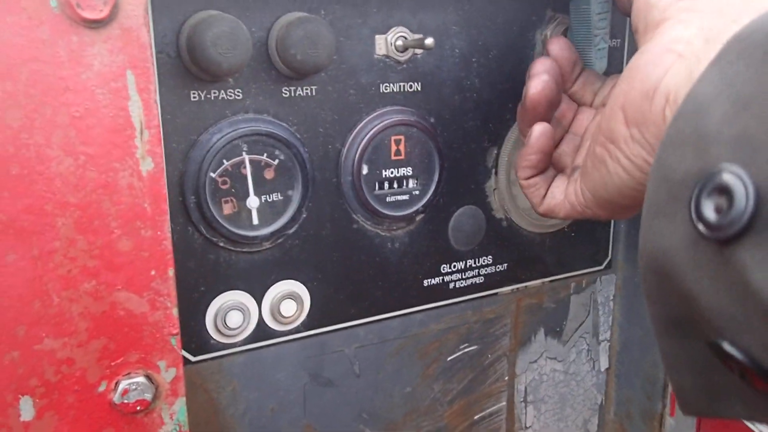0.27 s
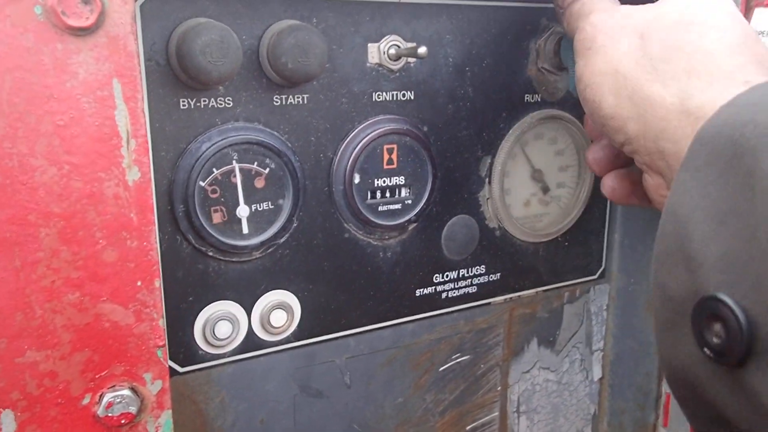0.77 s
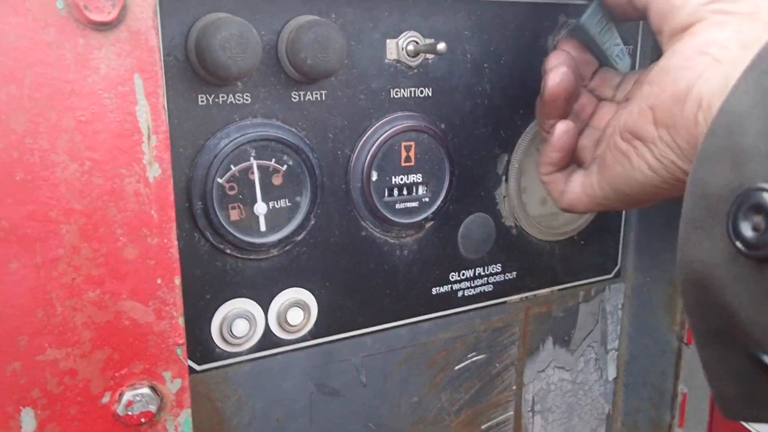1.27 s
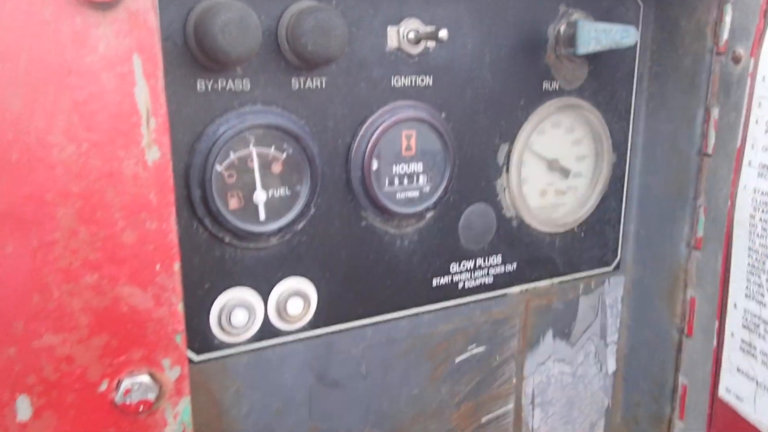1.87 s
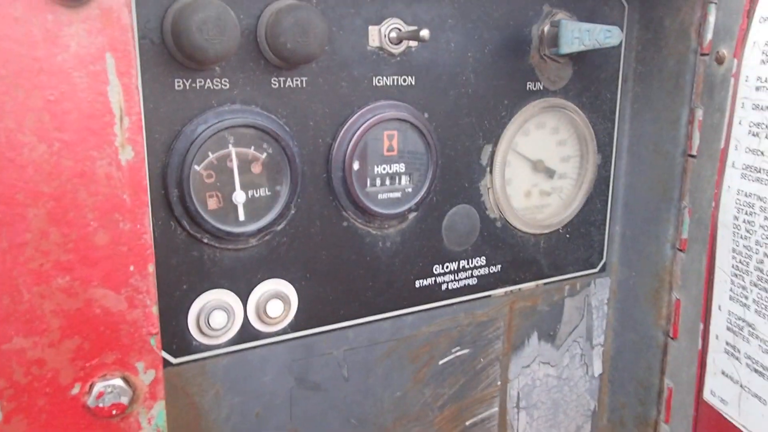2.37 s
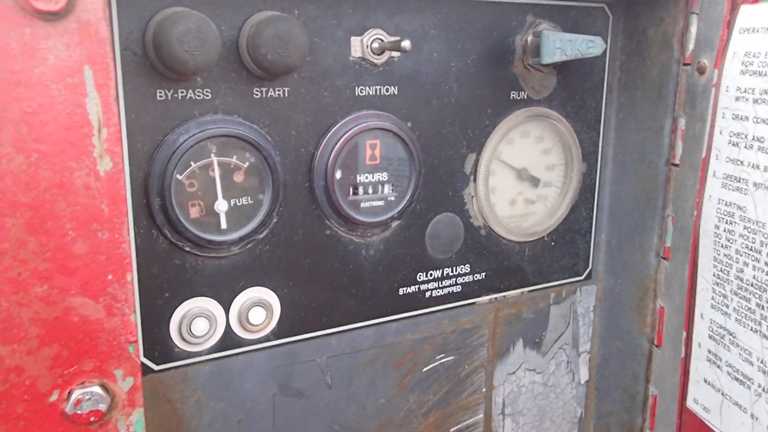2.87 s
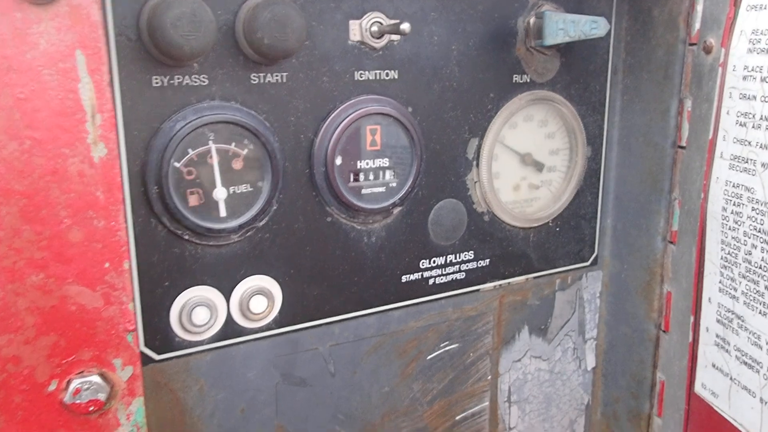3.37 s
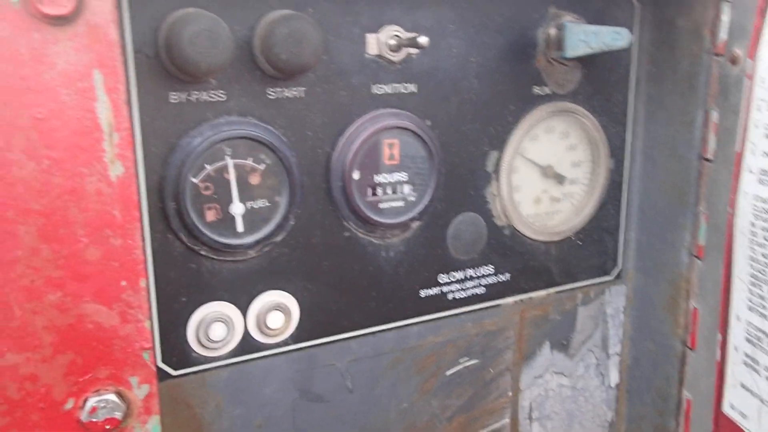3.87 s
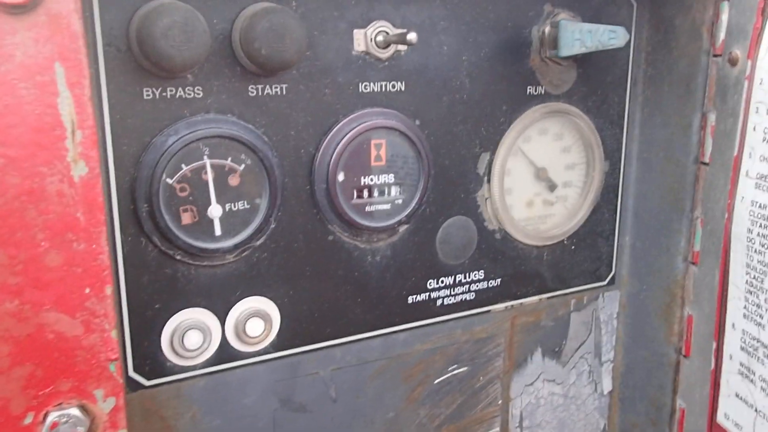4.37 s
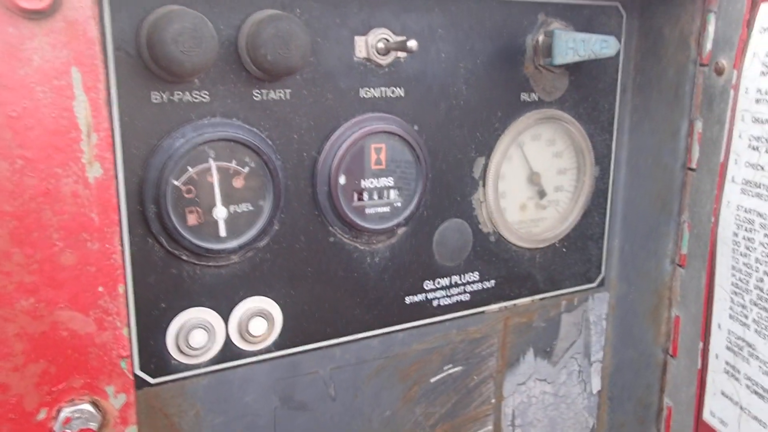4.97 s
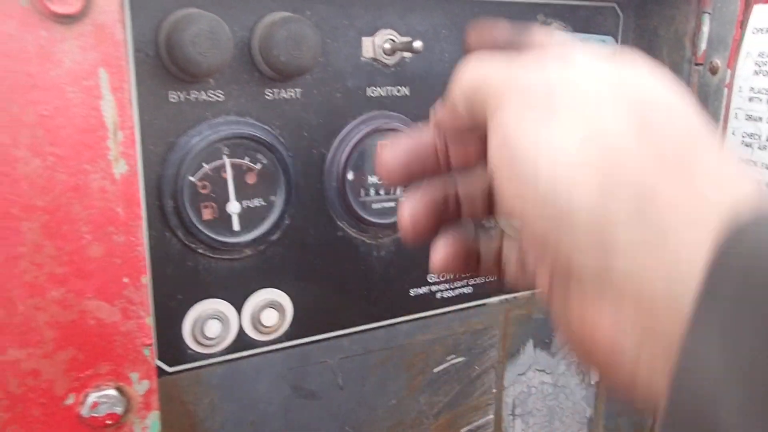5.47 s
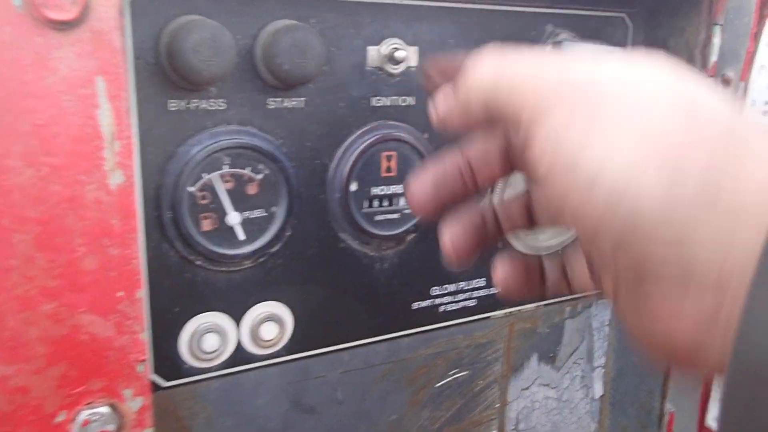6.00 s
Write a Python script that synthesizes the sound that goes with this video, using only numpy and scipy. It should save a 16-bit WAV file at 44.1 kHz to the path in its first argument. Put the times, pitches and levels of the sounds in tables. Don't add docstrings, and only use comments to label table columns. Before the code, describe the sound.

Very close to the microphone, compressed air roars from an open valve, wide and bright, then narrows into a whistling jet with a metallic, hollow echo from the housing. It shuts abruptly. The recording level climbs and reveals a clattering diesel idle, rotor whine and a faint leak hiss. Near the end a switch clicks and the engine begins running down. The left side is muffled and much duller.

```python
import sys
import numpy as np
from scipy import signal
from scipy.fft import rfft, irfft, next_fast_len
from scipy.io import wavfile
from scipy.ndimage import uniform_filter1d

SR = 44100
rng = np.random.default_rng(int(sys.argv[2]) if len(sys.argv) > 2 else 0)


def dump_mix(stems):
    frames = np.atleast_2d(stems).T
    limited = np.clip(frames, -1, 1)
    pcm = np.round(limited * 32767).astype(np.int16)
    wavfile.write(sys.argv[1], SR, pcm)


def elevation(decibels):
    levels = np.asarray(decibels, float)
    return 10 ** (levels / 20)


N = 275166
T = np.arange(N) / SR
SLOW = T[::16]
SIZE = next_fast_len(N + SR // 4)
HZ = np.maximum(np.arange(SIZE // 2 + 1) * SR / SIZE, 1)

SHUTS_S, SEALED_S = 4.02, 4.046
LOADS_S, FUEL_CUT_S, UNFIRED_S = 1.69, 5.96, 0.097
IDLE_HZ = 13.053

# start_s, narrow_share (of the jet, 0-1)
VALVE_TURN = [
    (0, 0.1),
    (1.2, 0.21),
    (1.6, 0.26),
    (1.9, 0.79),
    (2.4, 0.91),
    (4.04, 0.98),
]
# freq_hz, level_db
OPEN_PORT = [(2400, 0), (3000, 2.5), (3750, -1.5), (4020, -7.5), (4350, 5.5), (5200, 6.5), (6600, 3.5),
             (7900, 6), (8600, 3.5), (9250, -4), (9800, -0.5), (14000, 0), (15200, -0.5), (15700, -15)]


def since(s):
    return np.maximum(T - s, 0)


def curve(table):
    s, *columns = np.transpose(table)
    return [np.interp(T, s, c) for c in columns]


def fine(v):
    return np.interp(T, SLOW, v)


def shape(table, axis=1):
    table = np.array(table)
    return np.interp(np.log(HZ), np.log(table[:, 0]), table[:, axis])


def through(x, response):
    return irfft(rfft(x, SIZE) * response, SIZE)[:N]


def heard(x, lo_hz, hi_hz):
    band = through(x, elevation(shape(OPEN_PORT)) * (HZ > lo_hz) * (HZ < hi_hz))
    return x / np.sqrt(np.mean(band ** 2))


def walk(rate):
    k = int(SR / 16 / rate)
    held = np.repeat(rng.standard_normal(len(SLOW) // k + 1), k)[:len(SLOW)]
    return 1.3 * uniform_filter1d(uniform_filter1d(held, k), k)


def whistle(hz, width_hz, db):
    pole = np.exp(-np.pi * width_hz * 16 / SR)
    swell = elevation(db + 1.96 * walk(2.886) + 1.45 * walk(20))
    a, b = signal.lfilter([1 - pole], [1, -pole], rng.standard_normal((2, len(SLOW)))) * swell
    centre_hz = hz * (1 + .006 * walk(2.5) - .0025 * (SLOW - 2.5))
    phase = 2 * np.pi * np.cumsum(fine(centre_hz)) / SR
    return (fine(a) * np.cos(phase) + fine(b) * np.sin(phase)) / np.sqrt(8)


def turbulence(spectrum, common_db, own_db, pipes=(), upper_pipes_db=0):
    colour = elevation(shape(spectrum))
    noise = rfft(rng.standard_normal(SIZE)) * colour
    common = common_db * (walk(5) + walk(40))
    halves = 2 * np.log2(HZ)
    first, last = int(2 * np.log2(spectrum[0][0])), int(2 * np.log2(spectrum[-1][0]))
    out = 0
    for step in range(first, last + 2):
        bell = .5 + .5 * np.cos(np.pi * np.clip(halves - step, -1, 1))
        out = out + fine(elevation(common + own_db * walk(11))) * irfft(noise * bell, SIZE)[:N]
    for hz, width_hz, db in pipes:
        level_db = db + upper_pipes_db[::16] * (hz > 7000)
        out = out + np.interp(hz, HZ, colour) * whistle(hz, width_hz, level_db)
    return out


def tones(cycles, orders, wander_db):
    out = 0
    for k, db in orders:
        swell = fine(elevation(db + wander_db * (walk(2.89) + walk(25))))
        out = out + swell * np.sin(2 * np.pi * (k * cycles + rng.random()))
    return out


def engine_speed():
    free_hz, settle_s, run_down_hz_per_s = 16, 0.33, 13
    eased = .5 - .5 * np.cos(np.pi * np.clip(since(LOADS_S) / settle_s, 0, 1))
    return free_hz + (IDLE_HZ - free_hz) * eased - run_down_hz_per_s * since(FUEL_CUT_S)


def rotor_load():
    # start_s, level_db
    load = [
        (1.7, -17),
        (2.6, -4),
        (4.05, -3.5),
        (4.3, -7),
        (4.6, 0.5),
        (4.9, -5.5),
        (5.5, -9.5),
        (6.24, -13),
    ]
    return curve(load)[0]


def small_leak(cycles, whine_db):
    # freq_hz, level_db
    hiss = [(500, -12), (2000, -6.5), (5000, 0), (10000, -1.5), (16000, -5)]
    # freq_hz, width_hz, over_hiss_db
    pipes = [(5260, 140, -2), (10400, 130, 2), (11700, 210, -9)]
    level_db, late_db, build_s, blowdown_db_per_s = -41.3, -4.5, 0.15, 7
    leak = heard(turbulence(hiss, 0.29, 0.75, pipes, 0.76 * whine_db + 4.3), 4160, 9200)
    pulse_db = 0.25 * np.cos(2 * np.pi * cycles)
    build_db = late_db * np.exp(-since(SEALED_S) / build_s)
    return leak * elevation(pulse_db) * elevation(level_db + build_db + blowdown_db_per_s * since(FUEL_CUT_S))


def screw_rotors(cycles, whine_db):
    # cycle_multiple, level_db
    mesh = [(48, -9), (60, 2.5), (96, -4), (108, -11), (120, -7), (132, -17), (144, -10.5)]
    return tones(cycles, mesh, 1.7) * elevation(-42 + whine_db)


def engine_exhaust(cycles, emerge_db, unfired_db, sealed):
    # cycle_multiple, level_db
    orders = [(3, -38), (4, -6), (5, -27), (6, -65), (7, -11), (8, 3), (9, -28.5), (10, -20)]
    beat = tones(cycles, orders[:2], .4) * elevation(0.4 * unfired_db)
    bark = tones(cycles, orders[2:], .4) * elevation(unfired_db)
    return heard(beat + bark, 45, 127) * elevation(-41.5 + emerge_db + 1.5 * sealed)


def engine_body(cycles, speed, whine_db, emerge_db, unfired_db, sealed):
    # cycle_multiple, level_db
    hum = [(13.35, -2.5), (14, -25), (20, -6.5), (24, 4), (27, -0.5), (29, -8), (30, -12), (34, -28),
           (35, -11), (36, -5), (38, -6), (40, -6.5), (52, -19), (61, -4), (68, -7.5), (82, -1.5),
           (102, -17)]
    # freq_hz, level_db
    clatter = [(30, -28), (70, -7.5), (160, 1), (300, -3), (700, -2), (1100, -4), (1600, -8), (2300, -14.5),
               (5000, -19.5)]
    block = tones(cycles, hum, 1.6) * elevation(-13.0 + .5 * emerge_db + 4.2 * sealed + 0.15 * unfired_db)
    pattern = rng.standard_normal(3380)
    rattle = np.interp(cycles % 1 * len(pattern), np.arange(len(pattern)), pattern)
    rattle = heard(through(rattle, elevation(shape(clatter))), 400, 1800) * elevation(-8.0)
    loose = heard(turbulence(clatter, 0.33, 0.83), 290, 2600) * elevation(-2.5)
    slowing = np.minimum(speed / IDLE_HZ, 1) ** 0.3
    return (block + rattle + loose) * elevation(-41.5 + 1.2 + 0.12 * whine_db) * slowing


def machine():
    speed = engine_speed()
    cycles = np.cumsum(speed) / SR
    whine_db = rotor_load()
    emerge_db = -24 * np.exp(-since(LOADS_S) / 0.19)
    unfired_db = -13 * np.clip(since(FUEL_CUT_S) / UNFIRED_S, 0, 1)
    sealed = np.clip(since(SHUTS_S) / 0.3, 0, 1)
    air = small_leak(cycles, whine_db) + screw_rotors(cycles, whine_db)
    exhaust = engine_exhaust(cycles, emerge_db, unfired_db, sealed)
    return air + exhaust + engine_body(cycles, speed, whine_db, emerge_db, unfired_db, sealed)


def switch():
    # start_s, peak_db
    snaps = [
        (5.922, -24.5),
    ]
    out = np.zeros(N)
    for s, db in snaps:
        t = since(s)
        envelope = (T > s) * (1 - np.exp(-t / .001)) * np.exp(-t / 0.0043)
        out += elevation(db) * envelope * rng.standard_normal(N)
    return through(out, 1 / (1 + (3500 / HZ) ** 4) / (1 + (HZ / 9000) ** 4))


def wide_blast():
    # freq_hz, level_db
    hiss = [(40, -38), (70, -14), (110, -11), (300, -8), (1000, -7), (2500, -6), (4500, -2), (7000, -1.5),
            (10000, -6), (14000, -1), (16000, 0)]
    # freq_hz, width_hz, over_hiss_db
    pipes = [(4510, 143, 3), (4960, 160, 1.5), (5396, 240, 6.5), (5660, 110, 0), (7770, 380, 1.5)]
    return heard(turbulence(hiss, 0.64, 0.83, pipes, np.full(N, -0.8)), 4760, 7950)


def narrow_jet():
    # freq_hz, level_db
    hiss = [(100, -52.5), (400, -17.5), (1000, -10), (2500, -3), (5000, 1), (7700, 0.5), (10000, -6),
            (14000, -4), (16000, -3)]
    # freq_hz, width_hz, over_hiss_db
    pipes = [(929, 77, 1.8), (2613, 59, 4.2), (3244, 150, 3.1), (3748, 100, 0.5), (4497, 77, 8.1),
             (4930, 85, 4.7), (5100, 59, 8), (5290, 71, 6.6), (5720, 100, 7.5), (6030, 110, 2),
             (6790, 140, 1), (7350, 66, 9.5), (7730, 77, 5), (7880, 75, 8), (8210, 145, 3), (8500, 88, 5.6)]
    # delay_ms, gain_below_4khz, gain_above_4khz
    panels = [(1.36, 0.052, 0.065), (1.56, 0.11, -0.091), (1.72, 0.058, 0.054), (2.2, -0.18, 0.0067),
              (2.4, 0.3, -0.052), (2.75, -0.47, 0.043), (3.1, 0.03, -0.032), (4.3, 0.23, 0.18)]
    upper_db = -6.5 + 5.5 * since(2.08) - 500 * since(4.02)
    high = 1 / (1 + (4000 / HZ) ** 8)
    comb = 1
    for ms, lo, hi in panels:
        comb = comb + (lo + (hi - lo) * high) * np.exp(-2j * np.pi * HZ * ms / 1000)
    return heard(through(turbulence(hiss, 0.6, 0.48, pipes, upper_db), comb), 3980, 7230)


def vent():
    vent_db, sag_db_per_s, shut_db_per_s, sealed_db_per_s = -11.2, 0.45, 150, 900
    narrow = np.clip(curve(VALVE_TURN)[0], 0, 1)
    closing_db = shut_db_per_s * since(SHUTS_S) + sealed_db_per_s * since(SEALED_S)
    level_db = vent_db - sag_db_per_s * T - closing_db
    drain = elevation(vent_db - 15) * (T > SEALED_S) * np.exp(-since(SEALED_S) / 0.025)
    air = np.sqrt(1 - narrow) * wide_blast() + np.sqrt(narrow) * narrow_jet()
    return air * (elevation(level_db) + drain)


def scene():
    return np.tile(machine() + switch() + vent(), (2, 1))


def automatic_gain():
    freed_s, climb_db, climb_s, late_db_per_s = 4.06, 23.5, 0.155, 14
    climbed_db = climb_db * (1 - np.exp(-(since(freed_s) / climb_s) ** 1.5))
    return elevation(climbed_db + late_db_per_s * since(FUEL_CUT_S + UNFIRED_S))


def roll_off(x):
    return signal.sosfilt(signal.butter(12, 15730, fs=SR, output="sos"), x)


def record(dry):
    # freq_hz, level_db, lag_rad
    blocked_port = [(50, -0.5, 0.98), (109, -4.5, 1.15), (260, -11, 1.08), (700, -19.5, 2.1),
                    (1300, -26, 1), (2200, -31, 2), (3120, -23.5, 1.4), (4000, -51, 6), (4900, -62, 2.8),
                    (9000, -48, 2.3), (15500, -64, 4.8)]
    # freq_hz, level_db
    cavity_ring = [(4900, -40), (5250, -41), (5500, -22), (6000, -8), (6500, -18), (6900, -5.5),
                   (7500, -16), (8300, -14), (8700, -2), (9000, -24), (9300, -45)]
    wide_db, narrow_db, sealed_db = 4, -3.4, -6.5
    port = elevation(shape(OPEN_PORT)) * (HZ < 15750)
    right = through(dry[1], port)
    lag = np.exp(-1j * shape(blocked_port, axis=2))
    wall = through(dry[0], port * elevation(shape(blocked_port)) * lag)
    delay_s = np.interp(HZ, np.arange(0, SR / 2, 60), rng.uniform(-.03, .04, SR // 120 + 1))
    paths = np.exp(-2j * np.pi * np.cumsum(delay_s) * SR / SIZE)
    venting_db = wide_db + (narrow_db - wide_db) * curve(VALVE_TURN)[0]
    cavity_db = np.where(T < SEALED_S + 0.03, venting_db, sealed_db)
    cavity = through(dry[0], port * elevation(shape(cavity_ring)) * paths) * elevation(cavity_db)
    mix = np.clip(automatic_gain() * [wall + cavity, right], -1, 1)
    return roll_off(mix)


dry = scene()
out = record(dry)
dump_mix(out)
```